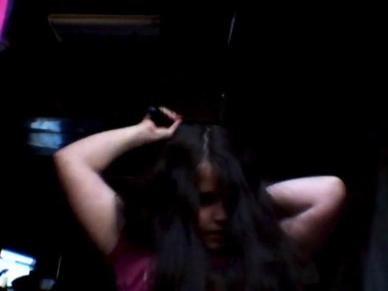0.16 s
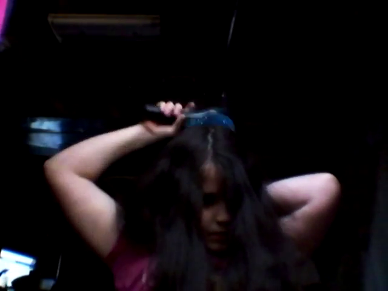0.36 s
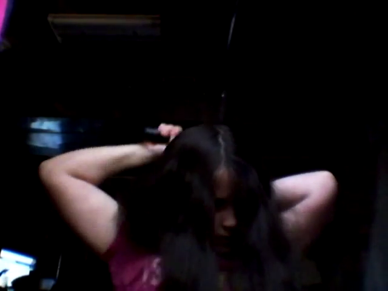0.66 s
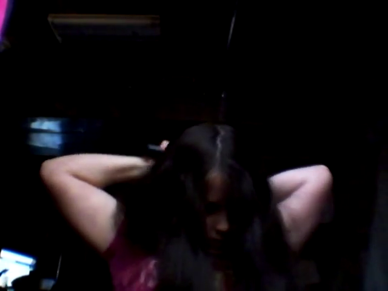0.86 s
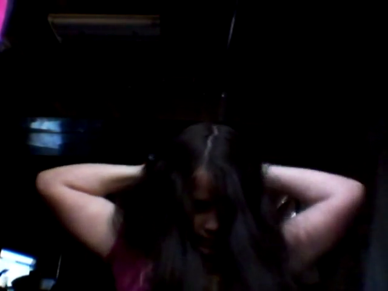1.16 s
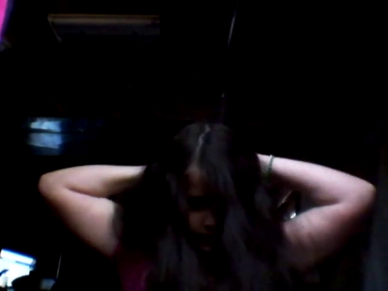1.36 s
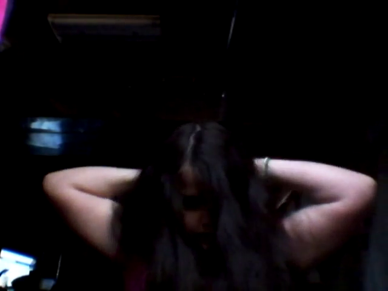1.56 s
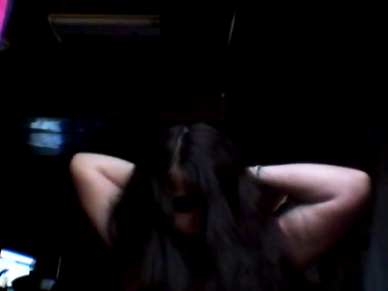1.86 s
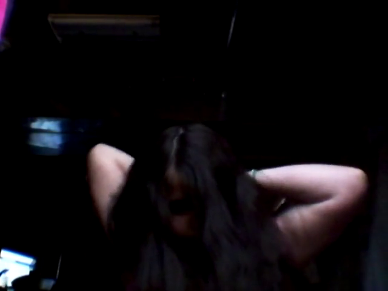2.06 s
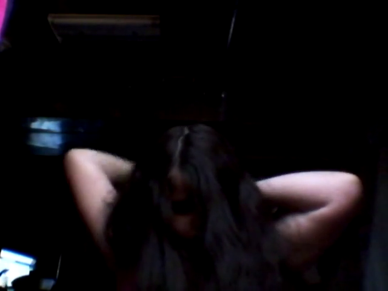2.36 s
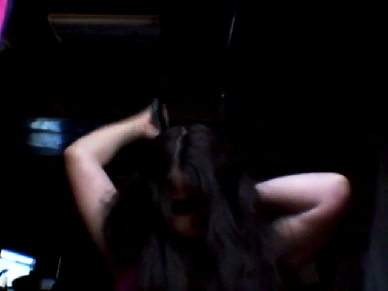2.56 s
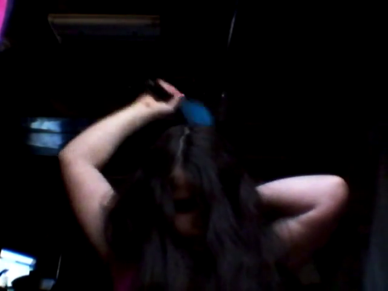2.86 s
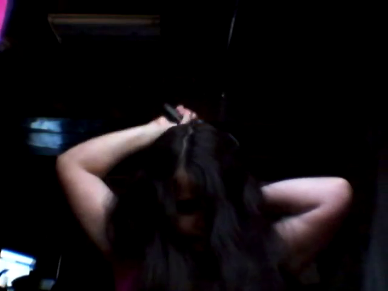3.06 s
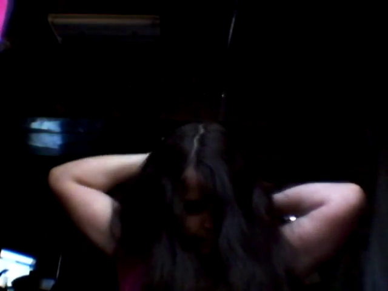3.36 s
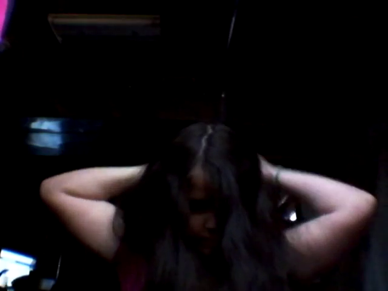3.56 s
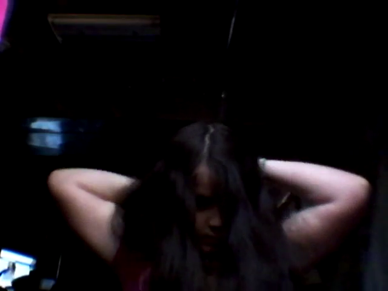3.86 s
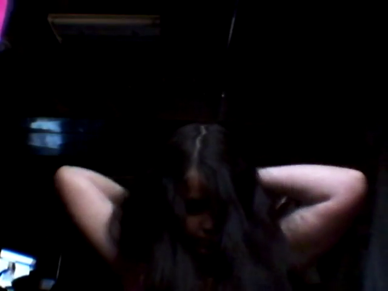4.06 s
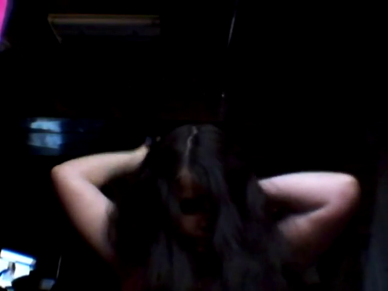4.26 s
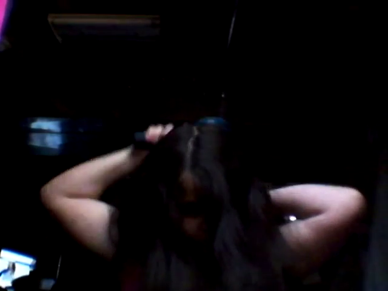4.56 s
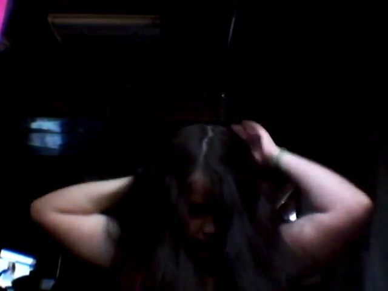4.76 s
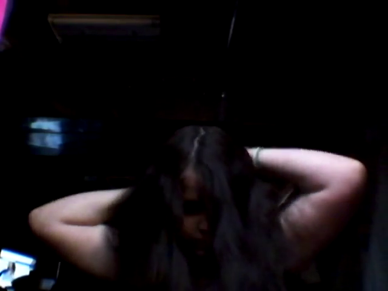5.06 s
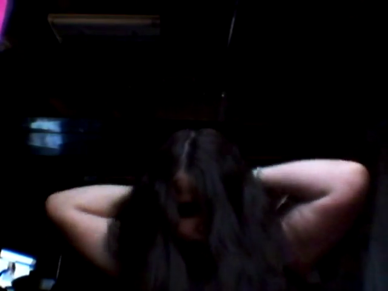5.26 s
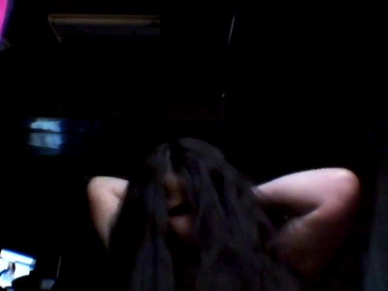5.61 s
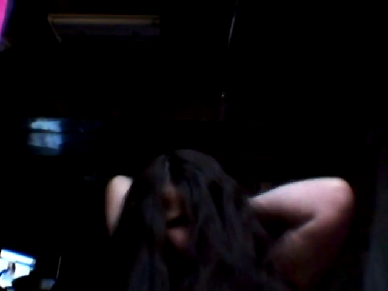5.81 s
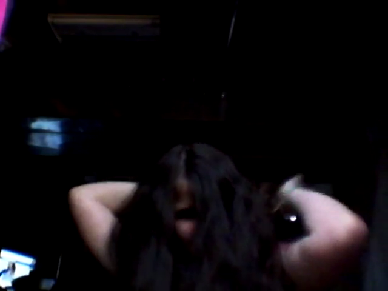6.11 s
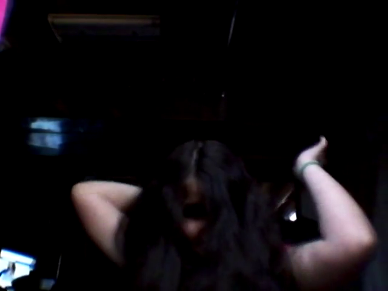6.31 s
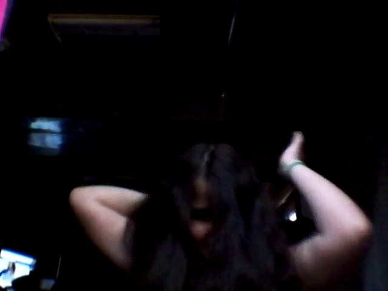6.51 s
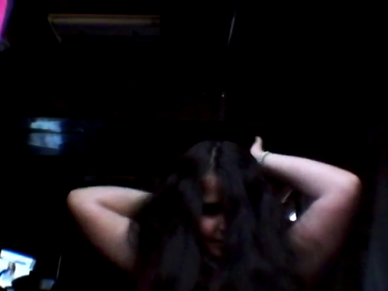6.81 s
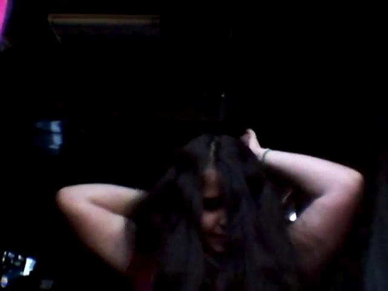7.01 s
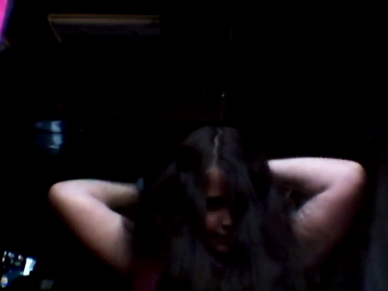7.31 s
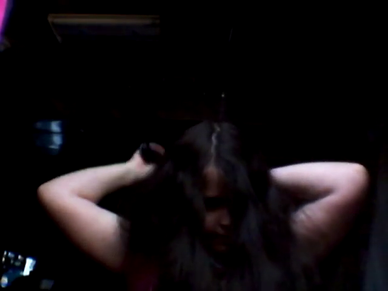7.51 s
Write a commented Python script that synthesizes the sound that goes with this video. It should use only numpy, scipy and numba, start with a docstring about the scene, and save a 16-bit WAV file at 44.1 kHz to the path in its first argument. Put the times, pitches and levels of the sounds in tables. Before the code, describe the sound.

Close to the microphone in a small quiet room, a plastic brush passes through long thick hair. A swish opens at once, then longer strokes build into coarse tugs, separated by brief lulls. Bristles springing from tangles give small clicks and dull knocks. Brushing thins towards the end, with scattered snaps and one last soft stroke. Steady hiss, low air murmur and a faint hum remain beneath.

```python
"""A dense swish is heard first: a plastic brush drawn through long hair, close up in a quiet room.
Strands slip over the bristles as random stick-slip impulses, coloured by the air pocket under the brush back.
Now and then a bristle springs out of a tangle with a snap: a short ringing rasp and a duller knock.
A near wall and a short room tail answer, over steady hiss, a low murmur of air and a faint wavering hum."""
import sys
import numpy as np
from scipy import signal
from scipy.fft import rfft, irfft
from scipy.io import wavfile
from scipy.ndimage import map_coordinates
from numba import njit

SR = 44100
rng = np.random.default_rng(int(sys.argv[2]) if len(sys.argv) > 2 else 0)


def persist_wave(psi):
    """Save psi, clipped to +-1, as 16-bit WAV."""
    counts = np.round(np.clip(psi, -1, 1) * 32767).astype(np.int16)
    wavfile.write(sys.argv[1], SR, np.atleast_2d(counts).T)


N = 337365
T = np.arange(N) / SR


def undb(db):
    """Decibels to gain."""
    return 10 ** (np.asarray(db) / 20)


def unit(x):
    """Scale to an rms of 1."""
    return x / np.sqrt(np.mean(x ** 2))


def walk(rate):
    """A smooth random wander with a spread near 1, through `rate` random points per second."""
    knots = rng.standard_normal(4096)
    return map_coordinates(knots, [T * rate], order=3, mode="wrap")


def response(points, size=1024):
    """Minimum-phase impulse response of unit energy with the given (Hz, dB) colour."""
    hz, db = np.transpose(points)
    freq = np.maximum(np.arange(size // 2 + 1) * SR / size, 1)
    colour_db = np.interp(np.log(freq), np.log(hz), db)
    cepstrum = irfft(np.log(undb(colour_db)))
    # folding the cepstrum forward in time makes the response causal
    cepstrum[1:size // 2] *= 2
    cepstrum[size // 2 + 1:] = 0
    ring = irfft(np.exp(rfft(cepstrum)))
    return ring / np.linalg.norm(ring)


def through(x, ring):
    """Pass a sound through an impulse response."""
    return signal.fftconvolve(x, ring)[:len(x)]


def burst(envelope):
    """A cluster of tiny impacts inside an envelope: nearly even in colour, unit energy."""
    x = rng.standard_normal(len(envelope)) * envelope
    # alternately flatten the spectrum and restore the envelope
    for _ in range(3):
        flat = irfft(np.exp(1j * np.angle(rfft(x))))
        x = flat * np.sqrt(envelope)
    return x / np.linalg.norm(x)


def slips(per_s, spread_db):
    """Tiny stick-slip impulses of uneven size, at an rms of 1 whatever their rate."""
    share = np.clip(per_s / SR, 1e-4, 1)  # chance of a slip in each sample
    size = undb(spread_db * np.clip(rng.standard_normal(N), -2, 2))
    signed_size = size * rng.choice([-1, 1], N)
    happens = rng.random(N) < share
    return unit(happens * signed_size / np.sqrt(share))


@njit
def resonance(x, hz, width):
    """State-variable band-pass with a moving centre."""
    y, band, low = np.empty(len(x)), 0., 0.
    for i in range(len(x)):
        g, k = np.tan(np.pi * hz[i] / SR), width / hz[i]
        v = (band + g * (x[i] - low)) / (1 + g * (g + k))
        band, low, y[i] = 2 * v - band, low + 2 * g * v, k * v
    return y


def gesture(start, swell, length, fade):
    """One movement of the hand: it gathers speed over the swell and dies away once its length is over."""
    rise = np.sin(np.pi / 2 * np.clip((T - start) / swell, 0, 1))
    return rise * np.exp(-np.maximum(T - start - length, 0) / fade)


# Passes of the brush or hand through the hair; levels are drive into the mix, before bunching and room.
# start_s, swell_s, length_s, fade_s, swish_level_db, hollow_db and sheen_db (both over the swish)
PASSES = [(-0.05, .03, 0.27, 0.1, -53.5, -2.5, -5), (0.37, 0.18, 0.66, 0.042, -54, -0.5, -7),
          (0.812, 0.076, 0.49, 0.042, -51, -6.5, -6), (1.72, .02, 0.036, 0.05, -61, -6, -9),
          (1.76, .08, 0.36, .05, -71.5, 4.5, -7), (2.216, 0.091, 0.21, 0.032, -55.5, -3.5, -3.5),
          (2.462, .04, 0.14, 0.017, -65, -6, -4), (2.615, 0.012, .17, 0.09, -54, -5.5, -2),
          (2.838, 0.053, 0.29, 0.09, -48.5, -3.5, -7.5), (3.42, 0.12, 0.083, 0.043, -60.5, -10, -6),
          (3.712, 0.084, 0.23, 0.019, -48, -7, -6.5), (3.958, 0.041, 0.056, 0.13, -55, -8, -4.5),
          (4.262, 0.39, 0.69, 0.031, -48.5, -6, -6.5), (5.167, 0.071, 0.14, 0.098, -64.5, -1, -6),
          (5.562, 0.014, 0.098, 0.025, -51, -10.5, -5.5), (5.75, 0.034, .38, 0.065, -59, -0.5, -5),
          (6.224, .04, 0.079, .12, -63.5, -13, -3), (7.13, 0.028, 0.17, 0.099, -60.5, 1.5, -3),
          (7.297, 0.088, 0.32, 0.09, -53, -2, -6)]
# Tugs, where the bristles bite into thick hair.
# start_s, swell_s, length_s, swish_level_db, hollow_db and sheen_db (both over the swish)
TUGS = [(0.89, 0.084, 0.071, -37, -7.5, -9.5), (1.095, 0.022, 0.2, -43.5, -5, -12.5),
        (1.413, 0.013, .025, -58, -16, -6), (2.862, 0.048, 0.07, -42, -3.5, -4.5),
        (2.99, 0.034, 0.11, -45, -16, -13), (3.81, 0.043, 0.1, -42, -5.5, -6),
        (4.5, .015, 0.014, -48, -1, -17), (4.605, .035, 0.11, -46.5, -11, -7),
        (4.71, 0.029, 0.16, -52.5, -21, -12), (4.834, 0.038, 0.1, -39.5, -7.5, -14)]
TUG_RELEASE_S = 0.014
# Loose hair that keeps stirring under and between the passes.
# swish_level_db, hollow_db and sheen_db (both over the swish)
STIR = (-72, -13, 0)
STIR_END_S, STIR_FADE_S = 6.35, 0.16


def effort():
    """Strength of swish, hollow and sheen: passes, tugs and stirring hair add up in power."""
    moves = [(gesture(s, swell, length, fade), *mix) for s, swell, length, fade, *mix in PASSES]
    moves += [(gesture(s, swell, length, TUG_RELEASE_S), *mix) for s, swell, length, *mix in TUGS]
    stirring = np.exp(-np.maximum(T - STIR_END_S, 0) / STIR_FADE_S)
    moves.append((stirring, *STIR))
    power = 0
    for shape, db, hollow_db, sheen_db in moves:
        gains = undb([db, db + hollow_db, db + sheen_db])
        power = power + np.outer(gains ** 2, shape ** 2)
    return np.sqrt(power)


HOLLOW_HZ, HOLLOW_SAG_OCTAVES = 1540, 0.59
PACKING_S, PACKING_POWER = 0.14, 1.16


def hollow_pitch(pull):
    """A long hard pull packs hair under the brush and lowers its air pocket; it recovers as the pull eases."""
    keep = np.exp(-1 / (PACKING_S * SR))
    packed = signal.lfilter([1 - keep], [1, -keep], pull)
    return HOLLOW_HZ * 2 ** (-HOLLOW_SAG_OCTAVES * (packed / packed.max()) ** PACKING_POWER)


# Colour of strands slipping over bristles: freq_hz, level_db (per Hz)
SWISH_COLOUR = [(1100, -34), (1650, -14), (2050, -1), (2500, -1), (2850, -2), (3150, -1.5), (3600, -4),
                (4100, -2.5), (4750, -3.5), (5200, -5.5), (6200, -4.5), (7100, -2), (8500, -10),
                (11000, -38)]
# Colour of the shaking brush back: freq_hz, level_db (per Hz)
BACK_COLOUR = [(250, -41), (450, -16.5), (700, -8.5), (880, -2), (1050, -2.5), (1500, -2), (1850, -6),
               (2600, -28.5)]
# Colour of hair sliding on hair: freq_hz, level_db (per Hz)
SHEEN_COLOUR = [(6000, -32), (8000, -3.5), (9000, 0.5), (11500, -2), (14500, -7)]
# Colour of the dull low rustle: freq_hz, level_db (per Hz)
RUSTLE_COLOUR = [(90, -30), (170, -10.5), (260, 0.5), (380, 6.5), (600, -2.5), (1000, -34.5)]


def brushing(hollow_width_hz=370.0, hollow_share=0.43, rustle_db=-72, rustle_power=0.3):
    """Strands slip over the bristles; a harder pull frees more of them, and they catch in small bunches."""
    pull, hollow_gain, sheen_gain = effort()
    per_s = 3500 + 5000 * pull / pull.max()
    bunches = undb(0.5 * walk(rate=37) + 1.33 * walk(rate=190))
    swish = through(slips(per_s, spread_db=9.5), response(SWISH_COLOUR))
    # the brush back shakes the pocket of air between itself and the head
    back = through(slips(per_s, spread_db=1), response(BACK_COLOUR))
    pocket = unit(resonance(back, hollow_pitch(pull), hollow_width_hz))
    hollow = unit(hollow_share * pocket + (1 - hollow_share) * back)
    # hair sliding on hair is finer grained than hair on bristle
    sheen = through(slips(2 * per_s, spread_db=1.5), response(SHEEN_COLOUR))
    # a dull low rustle under the brushing, nearly even in level
    rustle_noise = through(rng.standard_normal(N), response(RUSTLE_COLOUR))
    rustle = undb(rustle_db) * unit(pull ** rustle_power * rustle_noise)
    return bunches * (pull * swish + hollow_gain * hollow + sheen_gain * sheen) + rustle


WALL_S, ROOM_T60_S = .007, 0.25  # delay of the wall and tail, decay time of the tail


def room(x, near_db, wall_db, tail_db, size=8192, count=90):
    """Direct sound, early reflections off the desk and laptop, a near wall and a short tail; the paths change
    with every pose."""
    t = np.arange(size) / SR
    tail_colour = response([(300, 2.6), (4000, 3.7), (7500, 0.39), (14000, 4.6)])
    out = np.zeros(N + 2 * size)
    # evenly spaced poses, each with fresh random echoes, crossfade into one another
    pose = np.linspace(0, count, N)
    for k in range(count + 1):
        held = np.flatnonzero(abs(pose - k) < 1)
        scatter = burst(np.exp(-t / 0.0045) * (t > .001))
        wall = burst(np.exp(-t / 0.005))
        decay = np.exp(-np.log(1000) * t / ROOM_T60_S)
        tail = through(rng.standard_normal(size) * decay, tail_colour)
        late = undb(wall_db) * wall + undb(tail_db) * tail / np.linalg.norm(tail)
        ring = undb(near_db) * scatter + np.pad(late, (int(WALL_S * SR), 0))[:size]
        crossfade = np.cos(np.pi / 2 * (pose[held] - k))
        echo = signal.fftconvolve(x[held] * crossfade, ring)
        out[held[0]:held[0] + len(echo)] += echo
    return (x + out[:N]) / np.linalg.norm(undb([0, near_db, wall_db, tail_db]))


# Colour of the room's air: freq_hz, level_db (per Hz)
AIR_COLOUR = [(25, -9), (45, -14), (70, -6.5), (110, -1.5), (160, 2), (235, 2), (330, -2.5), (480, -4),
              (800, -5.5), (1300, -3.5), (2000, -2.5), (3500, -6), (7000, -11), (14800, -11.5)]
AIR_DB = -60.5  # rms
# Faint steady hum in the room: pitch_hz, level_db (rms)
HUM = [(161.5, -94.5), (236.9, -81.5), (482, -82), (910, -85.5)]


def quiet_room():
    """Steady hiss and low murmur of air, with a faint hum of sines whose phases waver."""
    air = unit(through(rng.standard_normal(N), response(AIR_COLOUR, size=8192)))
    hum = np.zeros(N)
    for hz, db in HUM:
        hum += undb(db) * unit(np.sin(2 * np.pi * hz * T + walk(rate=7.6)))
    return undb(AIR_DB) * air + hum


# Bristles springing free; the level is that of the rasp alone, before the room.
# start_s, level_db (rms), bright_hz (centre of its broad colour), ring_hz (of the bristle), release_s
SNAPS = [(0.472, -53, 6560, 6040, 0.0034), (1.2859, -46.5, 5530, 4180, 0.0015),
         (2.1943, -44.5, 2520, 2020, 0.0018), (2.198, -38.5, 2750, 2040, 0.0015),
         (2.6251, -47, 4760, 4870, 0.0015), (2.7393, -46.5, 5630, 3080, 0.0014),
         (3.176, -53.5, 5000, 3800, 0.00065), (3.6898, -35.5, 4320, 4120, 0.0015),
         (4.1800, -61, 2410, 2620, 0.0013), (4.264, -61, 1580, 1200, 0.002),
         (4.346, -53.5, 6000, 7200, 0.0027), (5.4318, -35.5, 3500, 2580, 0.0029),
         (5.5756, -49.5, 5000, 7200, 0.0043), (5.5970, -50, 5000, 7250, 0.0032),
         (5.704, -33.5, 4070, 2510, 0.0018), (5.7125, -45, 3900, 1940, 0.0032),
         (5.9690, -48.5, 2970, 4100, 0.016), (6.2041, -48, 2900, 3570, 0.0032),
         (6.214, -45, 3860, 4040, 0.0016), (6.749, -65.5, 5000, 6200, 0.001),
         (7.12, -40.5, 3270, 1960, 0.0039)]
# Colour of the plastic bristle tips: freq_hz, level_db (per Hz)
TIP_COLOUR = [(500, -6.5), (1400, -22), (2000, 0), (2900, 1), (4000, 1), (4800, 0.5), (5600, -3.5),
              (6900, 1), (8200, -5), (10500, -11.5), (14500, -34)]
# Colour of the knock in the brush back: freq_hz, level_db (per Hz)
KNOCK_COLOUR = [(150, -33), (350, -12.5), (530, -2.5), (690, -1.5), (900, 3.5), (1200, 0), (1800, 4.5),
                (3000, -13.5)]
# a duller snap knocks the brush back harder: level over the rasp at the reference pitch, fall per octave above
KNOCK_DB, KNOCK_REF_HZ, KNOCK_DB_PER_OCTAVE = -10, 3970, 8.5


def snaps(ring_db=6, ring_octaves=0.091, size=2048):
    """Each release is a short rasp of the ringing bristle and a duller knock in the brush back."""
    out = np.zeros(N + size)
    t = np.arange(size) / SR
    hz = np.geomspace(400, 15000, 200)
    tip_hz, tip_db = np.transpose(TIP_COLOUR)
    plastic_db = np.interp(np.log(hz), np.log(tip_hz), tip_db)
    for s, db, bright_hz, ring_hz, length in SNAPS:
        release = t / length * np.exp(-(t / length) ** 2)
        broad_db = -1.75 * np.log2(hz / bright_hz) ** 2
        peak_db = ring_db * np.exp(-(np.log2(hz / ring_hz) / ring_octaves) ** 2)
        colour = np.column_stack([hz, plastic_db + broad_db + peak_db])
        rasp = unit(through(burst(release), response(colour)))
        knock = unit(through(burst(release), response(KNOCK_COLOUR)))
        knock_db = KNOCK_DB - KNOCK_DB_PER_OCTAVE * np.log2(bright_hz / KNOCK_REF_HZ)
        start = int(s * SR)
        out[start:start + size] += undb(db) * (rasp + undb(knock_db) * knock)
    return out[:N]


def scene():
    """Brush and snaps in the room, over its quiet."""
    close = brushing() + snaps()
    return (room(close, near_db=2.5, wall_db=1.0, tail_db=3.0) + quiet_room())[None]


TOP_HZ = 14850


def record(dry):
    """The recorder cuts steeply above its top frequency, with an elliptic low-pass."""
    low_pass = signal.ellip(12, .2, 70, TOP_HZ, fs=SR, output="sos")
    return signal.sosfilt(low_pass, dry)


dry = scene()
out = record(dry)
persist_wave(out)
```